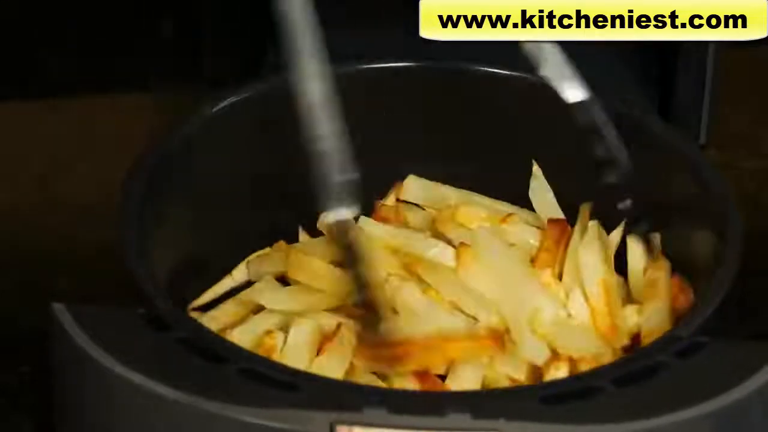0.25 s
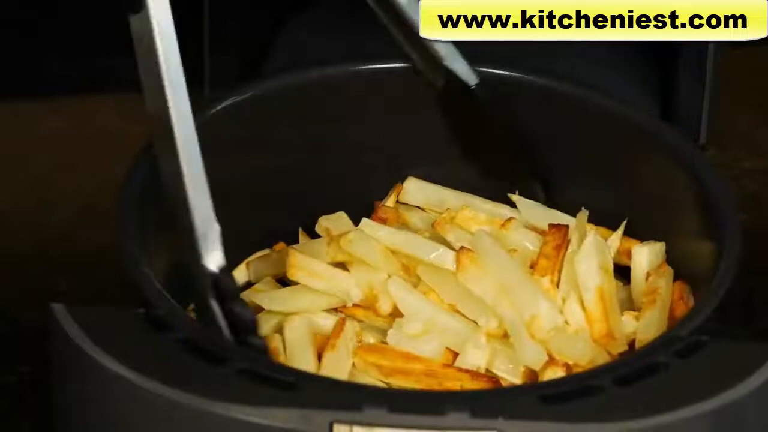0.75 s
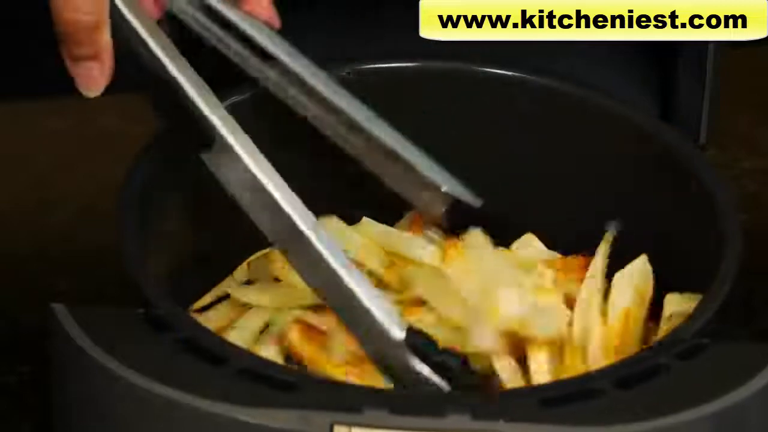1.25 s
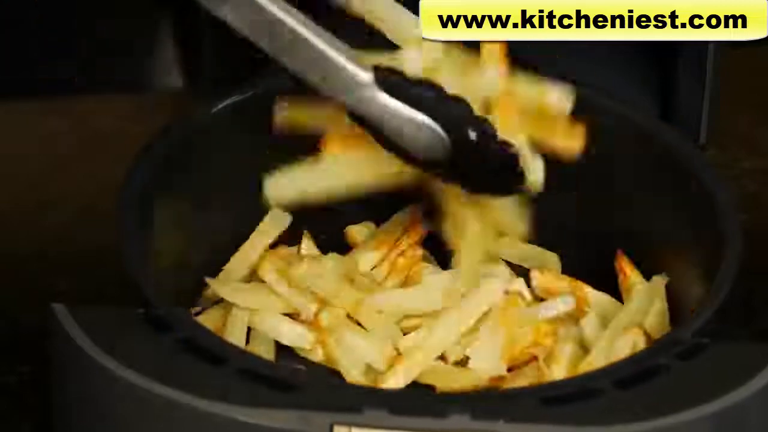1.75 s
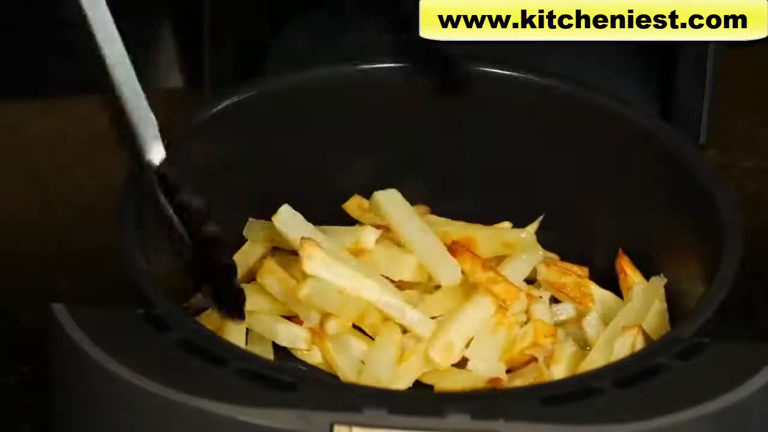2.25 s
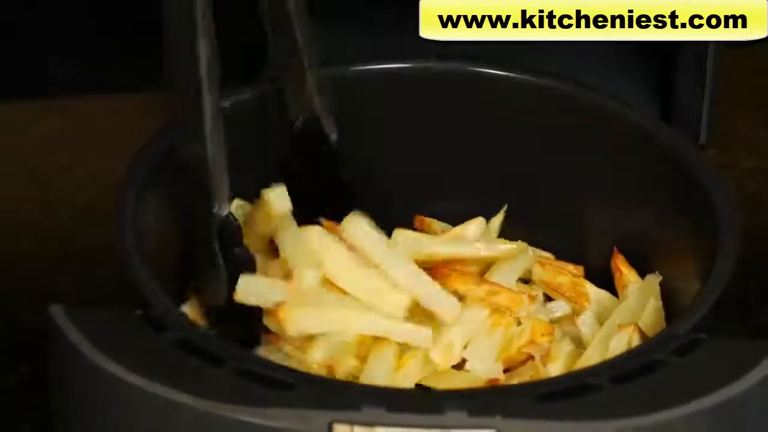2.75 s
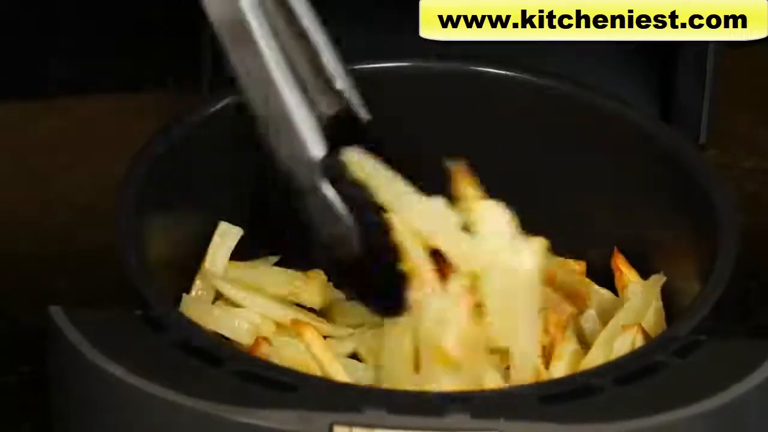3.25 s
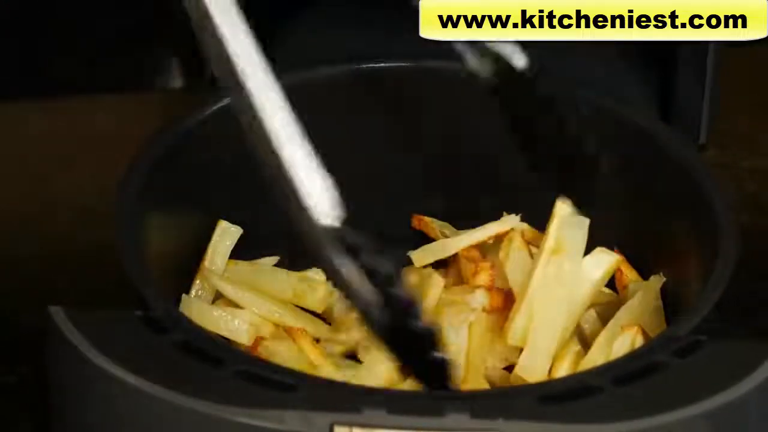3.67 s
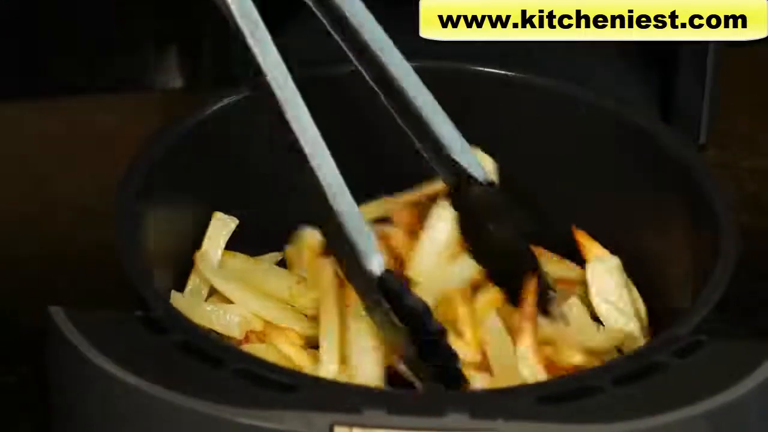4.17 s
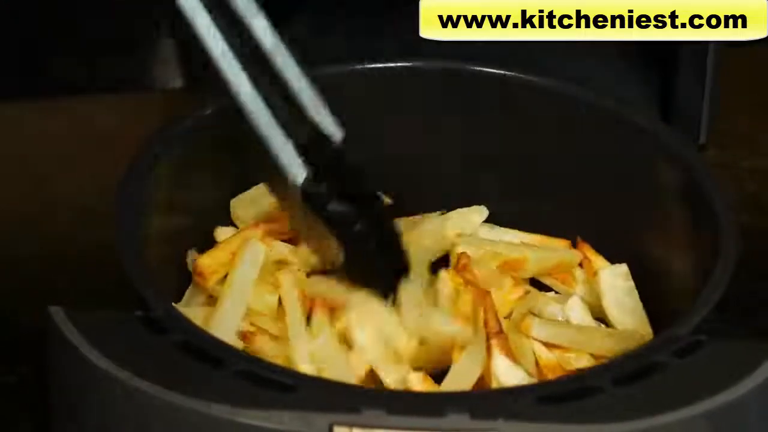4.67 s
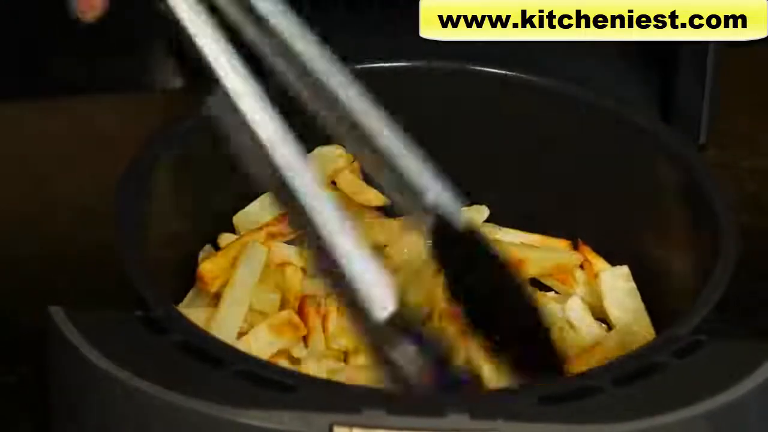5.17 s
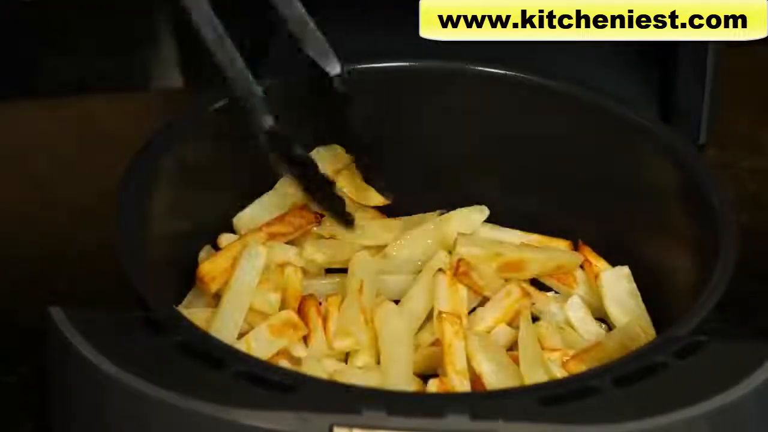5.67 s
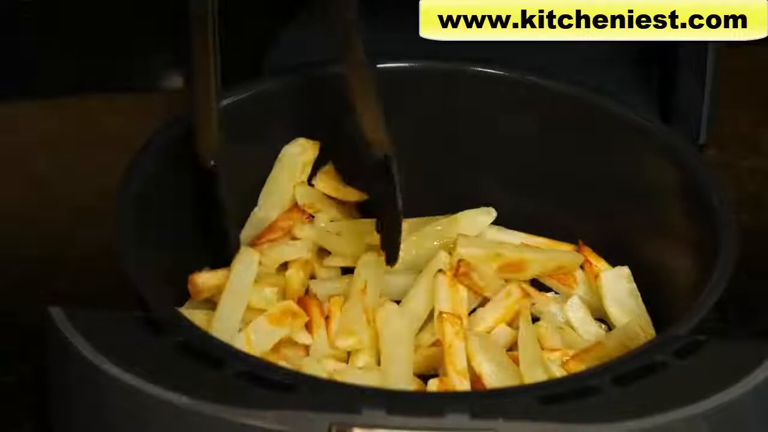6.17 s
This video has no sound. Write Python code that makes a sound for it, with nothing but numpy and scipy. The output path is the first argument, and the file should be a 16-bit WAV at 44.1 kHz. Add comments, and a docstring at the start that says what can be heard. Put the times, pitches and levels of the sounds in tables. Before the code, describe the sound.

Close, nearly mono sound of hot fries being tossed with tongs in a coated basket. Fine sizzle, snapping pops and dry rustling open the scene, with choked knocks at half a second. A calmer turning of fries follows, then a cluster of loud ringing clanks and plate rattle just after two seconds. Lighter taps and scratches lead to one last hard double clank near the end, over faint hum in a small kitchen.

```python
"""In a small kitchen, tongs toss hot fries in the coated basket of an air fryer, close by and nearly mono.
The fries sizzle (clicks and noise puffs), ping with bubbles, rustle (clumps of tiny slips) and pop (short noise).
The tongs scrape and knock the basket: its modes ring, and a loose plate rattles and falls back.
Clumps of fries land with soft thuds of filtered noise, over mains hum, steady air and a low rumble.
Levels in the tables are relative: the functions that play them may add trims of their own."""
import sys
import numpy as np
from scipy import signal
from scipy.fft import rfft, irfft
from scipy.io import wavfile
from scipy.ndimage import uniform_filter1d

SR = 44100
rng = np.random.default_rng(int(sys.argv[2]) if len(sys.argv) > 2 else 0)


def log_audio(samples):
    """Write samples as a 16-bit WAV file to the path given in sys.argv[1]."""
    # one column per channel
    frames = np.atleast_2d(samples).T
    # limit to full scale, then quantise
    limited = np.clip(frames, -1, 1)
    pcm = np.round(limited * 32767).astype(np.int16)
    wavfile.write(sys.argv[1], SR, pcm)


N = 283923  # length of the scene in samples
EDGE_HZ = 15900  # top of the sound's range
TAPS = 4096  # length of filters and short bursts in samples
BINS = np.fft.rfftfreq(TAPS, 1 / SR)  # filter frequencies in Hz


def amp(db):
    """Decibels to gain."""
    return 10 ** (np.asarray(db) / 20)


def unit(x):
    """Scales to rms 1."""
    return x / np.sqrt(np.mean(x ** 2) + 1e-20)


def unit_attack(x, size=441):
    """Scales so that the loudest short stretch (size in samples) has rms 1."""
    return x / np.sqrt(uniform_filter1d(x ** 2, size, mode="constant").max() + 1e-20)


def curve(rows, column=1):
    """One column of a table as a curve over the whole scene."""
    rows = np.array(rows)
    return np.interp(np.arange(N) / SR, rows[:, 0], rows[:, column])


def spectrum(points):
    """A table of a few frequencies and levels as dB on the filter bins."""
    hz, db = np.transpose(points)
    return np.interp(np.log(BINS + 1), np.log(hz + 1), db)


# resonances of the open basket that colour the small sounds inside: (f/Hz, width/Hz, level/dB)
CAVITY = [(729, 140, 6.5), (1203, 100, 12.5), (1868, 39, 8), (2397, 46, 5), (2810, 540, -0.5),
          (3990, 150, 0.5), (8630, 1600, 12.5)]


def cavity():
    """The basket's air resonances as dB on the filter bins."""
    return sum(db / (1 + (2 * (BINS - hz) / width) ** 2) for hz, width, db in CAVITY)


def colour(x, db):
    """Causal filter with the given gain, so that clicks keep their sharp fronts."""
    log_gain = np.log(amp(np.maximum(db, -100)))
    mirrored = np.r_[log_gain, log_gain[-2:0:-1]]
    # the minimum-phase filter puts its energy as early as it can
    taps = np.fft.ifft(np.exp(np.conj(signal.hilbert(mirrored)))).real
    return signal.oaconvolve(x, taps)[:len(x)]


def band(x, lo_hz, hi_hz, order=2):
    """Band-pass."""
    return signal.sosfilt(signal.butter(order, [lo_hz, hi_hz], "band", fs=SR, output="sos"), x)


def wander(rate):
    """Smooth random curve of rms 1 that changes about rate times a second."""
    smoothing = 1 + (np.fft.rfftfreq(N, 1 / SR) / rate) ** 4
    return unit(irfft(rfft(rng.standard_normal(N)) / smoothing, N))


def add(mix, s, sound):
    """Mixes a sound in at time s."""
    part = mix[max(round(s * SR), 0):][:len(sound)]
    part += sound[:len(part)]


def grains(per_s, spread_db):
    """Random tiny clicks: a few stand far above the rest, or below it if the spread is negative."""
    size = amp(spread_db * np.minimum(rng.exponential(1, N), 3.5))
    return size * rng.choice([-1, 1], N) * (rng.random(N) < per_s / SR)


def puffs(per_s, life_s):
    """Random tiny bursts of noise, each with a sharp front and a quick decay."""
    fading = np.exp(-np.arange(TAPS) / SR / life_s)
    power = signal.oaconvolve(grains(per_s, spread_db=1.5) ** 2, fading ** 2)[:N]
    return np.sqrt(abs(power)) * rng.standard_normal(N)


def burst(life_s, db, size=TAPS):
    """A coloured puff of noise that dies away."""
    return colour(rng.standard_normal(size) * np.exp(-np.arange(size) / SR / life_s), db)


def echo(x, t60, wet_db, delay=0.00042):
    """Adds a dense noise tail that begins after the delay and falls at 60 dB per t60 seconds."""
    t = np.arange(SR // 2) / SR
    tail = rng.standard_normal(len(t)) * amp(-60 * t / t60) * (t > delay)
    return x + amp(wet_db) * signal.oaconvolve(x, tail / np.linalg.norm(tail))[:N]


def swell(start, length, rise_s, fall_s):
    """Attack, hold and release of one push, over the whole scene."""
    t = np.arange(N) / SR - start
    return np.clip(t / rise_s, 0, 1) * np.exp(-np.maximum(t - length, 0) / fall_s)


# mains hum: (f/Hz, level/dB against the other tones)
HUM = [(59.2, 4), (118.4, -6), (247, -4)]
# the hum wavers: (t/s, level/dB)
HUM_LEVEL = [(0.0, -45), (0.25, -47.5), (0.41, -54), (1.16, -50.5), (1.27, -54.5), (3.14, -51), (3.32, -56),
             (4.98, -52), (6.44, -59)]
# colour of the kitchen air before the basket's resonances: (f/Hz, level/dB per Hz)
AIR = [(25, -24), (70, -7), (160, 11), (260, 11.5), (1000, -3), (2500, -16), (8000, -36), (16000, -16)]
# shoves that rock the drawer: (start t/s, length/s, level/dB)
SHOVES = [(0.0, 0.22, -49), (0.802, 0.33, -43.5), (2.611, 0.14, -43.5), (3.996, 0.32, -53)]


def background(air_db=-57, hum_db=-1, rumble_db=-63):
    """Mains hum as sine tones, kitchen air as steady noise and a drawer rumble that swells with each shove."""
    t = np.arange(N) / SR
    tones = sum(amp(db) * np.sin(2 * np.pi * (hz * t + rng.random())) for hz, db in HUM)
    hum = unit(tones) * amp(hum_db + curve(HUM_LEVEL))
    air = unit(colour(rng.standard_normal(N), spectrum(AIR) + cavity())) * amp(air_db)
    shoves = sum(amp(db) * swell(s, length, rise_s=0.1, fall_s=0.08) for s, length, db in SHOVES)
    rumble = unit(band(rng.standard_normal(N), 35.5, 52.3)) * (amp(rumble_db) + shoves)
    return hum + air + rumble


# pushes of the tongs through the fries: (start t/s, length/s, sizzle set free level/dB, rubbing level/dB)
STROKES = [(-0.02, 0.19, -32, -32), (0.165, 0.12, -36.5, -39), (0.52, 0.057, -39.5, -34.5),
           (0.698, 0.69, -35.5, -40.5), (0.844, 0.21, -37.5, -39), (1.16, 0.15, -56, -41.5),
           (1.325, 0.33, -35, -42), (1.665, 0.14, -37, -38), (1.82, 0.12, -35, -37),
           (2.043, 0.038, -35, -38), (2.18, 0.044, -40, -58), (2.54, 0.25, -37.5, -39.5),
           (2.82, 0.23, -39.5, -49), (3.184, 0.023, -57, -46), (3.454, 0.057, -49, -53.5),
           (3.558, 0.015, -34.5, -37), (3.873, 0.5, -40.5, -41.5), (4.435, 0.087, -45.5, -52.5),
           (4.616, 0.13, -38, -47), (4.815, 0.092, -41.5, -44), (5.062, 0.091, -41, -48),
           (5.176, 0.057, -37, -41), (5.232, 0.096, -44, -39), (5.455, 0.012, -53, -41),
           (5.595, 0.015, -60, -29), (6.278, 0.082, -40, -39)]
# the resting heap, which rises and falls: (t/s, sizzle level/dB, rubbing level/dB)
REST = [(0, -27, -45.5), (0.62, -30.5, -40), (1.5, -49.5, -61), (2.02, -35, -42), (2.9, -33.5, -44.5),
        (3.8, -41, -51.5), (4.3, -35.5, -53), (5.55, -39, -48), (6.44, -34, -41.5)]
RUB_FALL_S, SIZZLE_FALL_S = 0.011, 0.018  # the fries settle quickly; the steam lingers a little longer


def stirring(order, fall_s, rest_db=0):
    """Gain of sizzle (order 2) or rubbing (order 3): strokes add their power to that of the resting heap."""
    strokes = sum((amp(row[order]) * swell(row[0], row[1], 0.03, fall_s)) ** 2 for row in STROKES)
    return np.sqrt(amp(curve(REST, order - 1) + rest_db) ** 2 + strokes)


# colour of the sizzle before the basket's resonances: (f/Hz, level/dB per Hz)
SIZZLE = [(1500, -26), (2800, -5), (4200, 0), (7000, 0.5), (8700, -10.5), (9400, -5), (10200, -7.5),
          (11300, -2.5), (13000, 1), (15000, -2), (16000, -14)]
# crusts of different sizes crackle in different registers: f/Hz
CRACKLE_HZ = [4000, 7000, 11100, 13600]


def sizzle(level_db=-2.0, clump_db=0.0, crackle_db=-2):
    """Steam bursts through oily crusts: a fine fizz with sparse crackles, both livelier when fries are turned."""
    fizz = unit(grains(per_s=9000, spread_db=3.5))
    crackle = np.zeros(N)
    for hz in CRACKLE_HZ:
        top_hz = min(hz * np.sqrt(2), EDGE_HZ)
        crackle += band(puffs(per_s=55, life_s=0.0026), hz / np.sqrt(2), top_hz, order=1)
    clumps = amp(clump_db * wander(rate=36))
    mixed = (fizz + amp(crackle_db) * unit(crackle)) * clumps
    sound = colour(mixed, spectrum(SIZZLE) + cavity())
    return unit(sound) * amp(level_db) * stirring(order=2, fall_s=SIZZLE_FALL_S, rest_db=-8.5)


# oil bubbles ping in a few narrow registers: f/Hz
BUBBLE_HZ = [4340, 8140, 8930, 9320]


def bubbles(per_s=45, life_s=0.00094, level_db=-12):
    """Oil bubbles burst with tiny pitched pings, also while the fries lie still."""
    t = np.arange(TAPS) / SR
    pings = np.zeros(N)
    for hz in BUBBLE_HZ:
        ping = np.sin(2 * np.pi * hz * t) * np.exp(-t / life_s)
        pings += signal.oaconvolve(grains(per_s, spread_db=-2.0), ping)[:N]
    return unit(pings) * amp(level_db) * stirring(order=2, fall_s=SIZZLE_FALL_S, rest_db=-9.0)


# colour of the rubbing before the basket's resonances: (f/Hz, level/dB per Hz)
RUB = [(100, -1), (250, -2.5), (500, 5.5), (750, -1.5), (1000, -2), (1500, -4), (2200, -2.5), (2800, -2),
       (5000, -5), (7000, -15.5), (16000, -36)]


def rubbing(level_db=-3, clump_db=3.0):
    """Fries slide over each other and the coating in clumps of tiny slips."""
    slips = grains(per_s=3500, spread_db=1.0) * amp(clump_db * wander(rate=12.5))
    sound = colour(echo(slips, t60=0.57, wet_db=-11.0), spectrum(RUB) + cavity())
    return unit(sound) * amp(level_db) * stirring(order=3, fall_s=RUB_FALL_S)


# registers in which single fries graze their neighbours: f/Hz
CONTACT_HZ = [1736, 4000, 6320]


def contacts(per_s=40, life_s=0.0045, level_db=-3):
    """Fries graze each other: short, sharp-fronted scratches, each in its own register."""
    out = sum(unit(band(puffs(per_s, life_s), hz / np.sqrt(2), hz * np.sqrt(2))) for hz in CONTACT_HZ)
    return unit(colour(out, cavity())) * amp(level_db) * stirring(order=3, fall_s=RUB_FALL_S)


# tong tips sliding on the coating: (middle t/s, level/dB, f/Hz, length/s)
SCRAPES = [(0.019, -36, 670, 0.04), (0.152, -32.5, 4180, 0.062), (0.24, -28, 3450, 0.03),
           (0.739, -29, 5100, 0.022), (0.737, -34.5, 1120, 0.035), (2.66, -31, 4600, 0.088),
           (3.23, -42.5, 1610, 0.032), (4.09, -40, 4240, 0.1), (4.34, -40, 3140, 0.04),
           (4.912, -42.5, 4100, 0.074), (5.117, -37, 4650, 0.053), (6.334, -34.5, 4000, 0.043)]


def scrapes(level_db=-2, spread=1.44):
    """Short swelling strokes of dense slips, each in its own register."""
    out, slips = np.zeros(N), colour(grains(per_s=15000, spread_db=2.5), cavity())
    for s, db, hz, length in SCRAPES:
        start = s - length / 2
        stroke = slips[max(round(start * SR), 0):][:round(length * SR)]
        stroke = unit(band(stroke, hz / spread, hz * spread))
        arch = np.sin(np.pi * np.arange(len(stroke)) / len(stroke))
        add(out, start, amp(db + level_db) * stroke * arch)
    return out


# clumps of fries landing and tongs bumping the bottom: (t/s, level/dB, f/Hz, length/s)
THUDS = [(0.005, -35.5, 604, 0.04), (0.026, -39, 185, 0.058), (0.538, -34.5, 215, 0.033),
         (0.719, -36, 513, 0.046), (0.916, -44, 200, 0.099), (0.899, -33, 272, 0.034),
         (0.94, -35, 149, 0.026), (1.895, -45, 169, 0.011), (2.524, -33.5, 272, 0.035),
         (2.659, -31.5, 180, 0.043), (2.67, -39, 104, 0.087), (2.744, -38, 266, 0.0067),
         (3.244, -45, 318, 0.005), (3.898, -37, 263, 0.012), (4.636, -41.5, 305, 0.059),
         (5.248, -37, 167, 0.052)]


def thuds(level_db=0, spread=1.59):
    """Soft, ringless pushes on the bottom of the basket."""
    out, t = np.zeros(N), np.arange(SR // 4) / SR
    for s, db, hz, length in THUDS:
        weight = t / length * np.exp(-4 * t / length)
        push = band(weight * rng.standard_normal(len(t)), hz / spread, hz * spread)
        add(out, s, amp(db + level_db) * unit_attack(push))
    return out


# tongs striking the basket: (t/s, hollow level/dB, plate level/dB, wall level/dB, crack level/dB,
# ring length as a factor, low and high f/Hz favoured by the place struck)
KNOCKS = [(0.034, -34, -34.5, -39, -32.5, 0.95, 740, 3930), (0.505, -27, -25, -33, -26.5, 0.22, 650, 4150),
          (0.514, -26, -20.5, -26, -21.5, 0.54, 670, 4074), (0.564, -43, -36, -42, -54, 0.25, 700, 4074),
          (2.236, -26, -14.5, -13.5, -22, 0.84, 920, 3500),
          (2.382, -26.5, -20, -19.5, -22, 2.35, 900, 4020),
          (2.4295, -27.5, -17.5, -14, -15.5, 0.9, 780, 3040),
          (2.552, -27.5, -24.5, -27, -37, 0.19, 835, 3250), (3.89, -63, -37, -42, -49, 0.5, 710, 3930),
          (5.256, -48, -39, -42, -44, 0.37, 850, 3930), (5.7989, -27.5, -23, -23, -24.5, 1, 920, 3075),
          (5.803, -21, -16, -17, -54, 0.89, 780, 3075)]
# the loose plate falling back after a hard knock: (t/s, level/dB)
BOUNCES = [(2.295, -15.5), (5.8933, -17), (5.94, -24), (5.983, -50)]
# its share in each band: hollow, plate, wall, crack level/dB
BOUNCE_BANDS_DB = (-26, -4, -15.5, -20.5)
# low and high f/Hz that the plate favours
BOUNCE_HZ = (875, 3075)
BOUNCE_RING = 1.66  # ring length as a factor


def blows():
    """All that strikes the basket: the tongs, and the loose plate, which always favours the same pitches."""
    bounces = [(s, *np.add(db, BOUNCE_BANDS_DB), BOUNCE_RING, *BOUNCE_HZ) for s, db in BOUNCES]
    return list(KNOCKS) + bounces


# what the basket rings with: (f/Hz, level/dB, time to fall 60 dB at ring length 1/s)
BASKET = [(344, -5, 0.3), (382.5, 14.5, 0.15), (433, 9.5, 0.21), (606, -4, 0.12), (700, -1, 0.9),
          (746, -3, 0.6), (792, 7.5, 0.39), (845, -0.5, 0.49), (860, 1.5, 0.81), (920, 7, 0.57),
          (988, -6, 0.07), (1094, -21, 0.13), (1083, 9, 0.46), (1160, 12.5, 0.44), (1330, -6, 0.52),
          (1618, -3, 0.29), (1695, -14, 0.59), (1770, -26, 0.39), (2270, -5, 0.11), (2970, -10.5, 0.65),
          (3220, -0.5, 0.22), (3670, -14, 0.15), (3930, -8, 0.055), (4070, -2, 0.17), (4990, -9, 0.31)]
# borders between the hollow, plate, wall and crack bands: f/Hz
BAND_EDGES_HZ = [630, 1070, 2200]


def knocks(bands_db=(-2, -2.5, -2, -5.5), vary_db=-6.0, favour_db=4, favour_hz=55, high_favour_db=9,
           twin=0.0184, twin_db=-4, rise_s=0.00067, lag_s=0.000764, low_hz=280):
    """Each blow rings the modes in a randomly varied mix with two favoured pitches, over a dense, short clank."""
    out, t = np.zeros(N), np.arange(SR * 3 // 5) / SR
    hz, db, t60 = np.transpose(BASKET)[:, :, None]
    zone = np.digitize(hz[:, 0], BAND_EDGES_HZ)
    edges = [low_hz, *BAND_EDGES_HZ, hz.max()]
    chatter = amp(2.5 * wander(rate=60))  # the loose plate makes the ring uneven
    load = wander(rate=35)
    # the ring drops fast while the tongs still press on it, then dies freely
    press = (1 + 2.2 * np.exp(-t / 0.007)) * (1 - np.exp(-t / rise_s))
    for s, *levels, length, struck_hz, high_hz in blows():
        phase, variation, split = rng.uniform(-0.93, 1, (3, len(hz), 1))
        # the shifting load bends each mode's pitch by a small share
        bend = 0.004 * load[rng.integers(0, N - len(t), (len(hz), 1)) + np.arange(len(t))]
        turns = np.cumsum(hz * (1 + bend), 1) / SR
        # the load of fries and tongs splits each mode of the round basket into a beating pair
        first = np.sin(2 * np.pi * (turns + phase))
        second = np.sin(2 * np.pi * (turns * (1 + twin * split) + phase))
        pair = first + amp(twin_db) * second
        strength_db = db + vary_db * variation + favour_db * np.exp(-((hz - struck_hz) / favour_hz) ** 2)
        strength_db = strength_db + high_favour_db * np.exp(-((hz - high_hz) / favour_hz) ** 2)
        modes = pair * amp(strength_db) * np.exp(-np.log(1000) * t / (t60 * length))
        # many weak modes between the strong ones, quickly damped by the fries, stand out in a choked blow
        clank = rng.standard_normal(len(t)) * np.exp(-np.log(1000) * t / 0.08)
        clank_gain = amp(-9) / np.sqrt(length)
        for k, level in enumerate(levels):
            ring = unit_attack(press * modes[zone == k].sum(0))
            dense = unit_attack(band(press * clank, edges[k], edges[k + 1]))
            add(out, s + lag_s, amp(level + bands_db[k]) * (ring + clank_gain * dense))
    return band(out * chatter, low_hz, EDGE_HZ, order=3)


# colour of a knock's tick and bright crack: (f/Hz, level/dB)
CRACK = [(100, -10), (350, 2.5), (1500, 7.5), (2100, -3.5), (3200, -8), (5200, 3.5), (6000, -5), (8500, -3),
         (10200, -16), (13000, -12), (16000, -21)]
# colour of the loose plate's buzzing tail: (f/Hz, level/dB)
RATTLE = [(150, -22), (330, -5), (600, -2.5), (740, -13), (900, 10.5), (1020, 1), (1190, -1), (1350, -10.5),
          (1700, -12), (5000, -42)]


def clatter(tick_db=14, tick_s=0.00068, crack_db=-5.0, crack_s=0.033, rattle_db=-11.5, rattle_s=0.048,
            lag_s=0.00071):
    """The unpitched part of a blow: the tongs' tick and bright crack, and the buzz of the loose plate."""
    out, bright, buzz = np.zeros(N), spectrum(CRACK), spectrum(RATTLE)
    for s, *_, bright_db, length, _, _ in KNOCKS:
        tick = burst(tick_s, bright)
        add(out, s + lag_s, amp(bright_db + tick_db) * tick / abs(tick).max())
        crack = unit_attack(burst(crack_s * length, bright, size=8192))
        add(out, s + lag_s, amp(bright_db + crack_db) * crack)
    for s, _, plate_db, _, _, length, *_ in blows():
        rattle = unit_attack(burst(rattle_s * length, buzz, size=24000))
        add(out, s + lag_s, amp(plate_db + rattle_db) * rattle)
    return out


# the loudest oil pops and snapping crusts:
# (t/s, level/dB, low band level/dB and top band level/dB against the middle, decay/s)
POPS = [(0.12, -23, -12, -1, 0.0027), (0.3555, -32, -17, -10, 0.0006), (0.4938, -22, -13, -13, 0.0012),
        (0.5663, -23, -28, -8, 0.00099), (0.5973, -23.5, -17, -4, 0.0009), (0.6174, -28, -13, 1, 0.00046),
        (0.708, -25.5, -24, -11, 0.0014), (0.7716, -30, -21, 1, 0.0009), (0.8486, -26, -19, -15, 0.00075),
        (1.0296, -30, -25, -7, 0.0009), (1.0572, -24.5, -25, -10, 0.00045), (1.1504, -30, -14, 6, 0.0033),
        (1.2163, -25.5, -25, -1, 0.0016), (1.2627, -24.5, -8, 14, 0.0009), (1.3544, -28, 8, -25, 0.0021),
        (1.6086, -32, -12, 11, 0.0009), (1.6359, -28.5, 3, -5, 0.0006), (1.821, -28.5, 5, -1, 0.0021),
        (1.9789, -25.5, -3, -3, 0.00054), (2.0445, -22, -8, -3, 0.00087), (2.0472, -22.5, -14, 6, 0.00076),
        (2.1435, -23, -14, -7, 0.00071), (2.163, -19, -8, 4, 0.00048), (2.312, -29, -14, -20, 0.00099),
        (2.5134, -27, 6, 6, 0.0009), (2.6132, -29, -9, -10, 0.0023), (2.7062, -24, -6.5, -10, 0.00061),
        (2.7995, -31.5, -24, -9, 0.0017), (2.8224, -19.5, -7, 5, 0.00024), (3, -32, -5, -15, 0.004),
        (3.4438, -32, -11, -7, 0.00055), (3.607, -32.5, -13, -8, 0.0026), (3.786, -35, -13, -5, 0.0044),
        (4.4241, -32.5, -6, -13, 0.00076), (4.9861, -35.5, 6, -11, 0.011),
        (5.2182, -30.5, -1.5, -4, 0.0075), (5.31, -28, -7.5, -3, 0.0012), (5.465, -24, 5.5, 0, 0.00095),
        (5.6064, -22.5, 1, -1.5, 0.00026), (5.6622, -28.5, -6, -8, 0.00078),
        (5.9191, -27.5, -1, -4, 0.0023), (6.0628, -29.5, -9, -9, 0.0013), (6.1438, -31, 0, -5, 0.0029),
        (6.2393, -32.5, -1.5, 0, 0.0095)]
# borders of the low, middle and top bands: f/Hz
POP_EDGES_HZ = [1000, 4000, 10000, 16000]
# corners of a pop's spectrum: f/Hz
POP_TONE_HZ = [0, 1000, 3000, 8000, 11000, 16000]


def pops(snap_db=2.5, scatter_db=-14, scatter_s=0.022, rise_s=0.0002):
    """Oil and crusts give a short snap of noise, together with its faint scatter round the basket."""
    out, body_db, t = np.zeros(N), cavity(), np.arange(TAPS) / SR
    for s, db, low_db, top_db, life_s in POPS:
        # a wide band spreads its power thinner over each Hz
        density_db = np.array([low_db, 0, top_db]) - 10 * np.log10(np.diff(POP_EDGES_HZ))
        corners_db = np.r_[density_db[0] - 15, density_db[0], density_db, density_db[-1] - 3]
        tone = np.interp(BINS, POP_TONE_HZ, corners_db)
        tone = tone - tone.max()
        crack = rng.standard_normal(TAPS) * (1 - np.exp(-t / rise_s)) * np.exp(-t / life_s)
        snap = unit_attack(colour(crack, tone + body_db / 2), size=44)
        scatter = unit_attack(burst(scatter_s, tone + body_db))
        add(out, s, amp(db) * (amp(snap_db) * snap + amp(scatter_db) * scatter))
    return out


# single fries tapping the basket, the tongs or each other: (t/s, level/dB, f/Hz)
TAPS_OF_FRIES = [(1.3532, -25, 4430), (2.917, -34.5, 4500), (2.982, -32, 4500), (3.1425, -37, 2200),
                 (3.213, -32, 2020), (3.4617, -33.5, 5000), (3.4865, -35.5, 7000), (3.564, -36, 3000),
                 (3.609, -38.5, 1280), (3.7513, -36.5, 4470), (3.864, -36.5, 4530), (4.002, -35, 3000),
                 (4.026, -41, 1500), (4.4444, -33, 4440), (4.66, -33, 4800), (4.841, -34, 4200),
                 (4.8883, -43, 4500), (4.978, -34.5, 11000), (5.085, -37, 7000), (5.397, -36, 4500),
                 (5.732, -32.5, 6500), (6.069, -38, 6500)]


def fry_taps(level_db=0, life_s=0.0016, db_per_octave=6):
    """A fry's crisp tap, strongest round its own pitch and coloured by the basket."""
    out = np.zeros(N)
    for s, db, hz in TAPS_OF_FRIES:
        octaves = np.log2((BINS + 1) / hz)
        # a slope on both sides, rounded at the top
        tone = cavity() - db_per_octave * octaves ** 2 / np.hypot(1, octaves)
        add(out, s, amp(db + level_db) * unit_attack(burst(life_s, tone), size=132))
    return out


def scene():
    """Everything sounds from the middle, with a little kitchen reverberation."""
    hits = echo(knocks() + clatter() + thuds() + pops(), t60=0.037, wet_db=-16, delay=0.0052)
    small = fry_taps() + bubbles() + sizzle() + rubbing() + contacts() + scrapes()
    mid = hits + echo(small, t60=0.084, wet_db=-8.5, delay=0.00099) + background()
    # nearly mono: a very faint, short noise tail is added to one channel and subtracted from the other
    side = echo(mid, t60=0.053, wet_db=-47.5) - mid
    return np.array([mid + side, mid - side])


def record(dry):
    """Full-scale limit and band limit."""
    low_pass = signal.firwin(255, EDGE_HZ, window=("kaiser", 8), fs=SR)
    return signal.oaconvolve(np.clip(dry, -1, 1), low_pass[None], "same")


dry = scene()
out = record(dry)
log_audio(out)
```